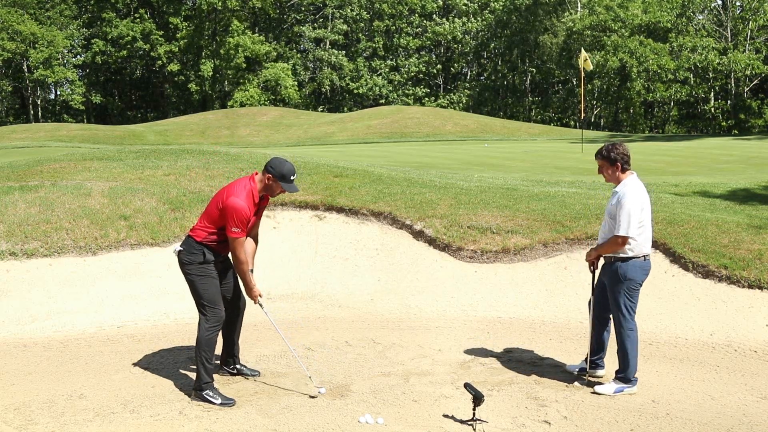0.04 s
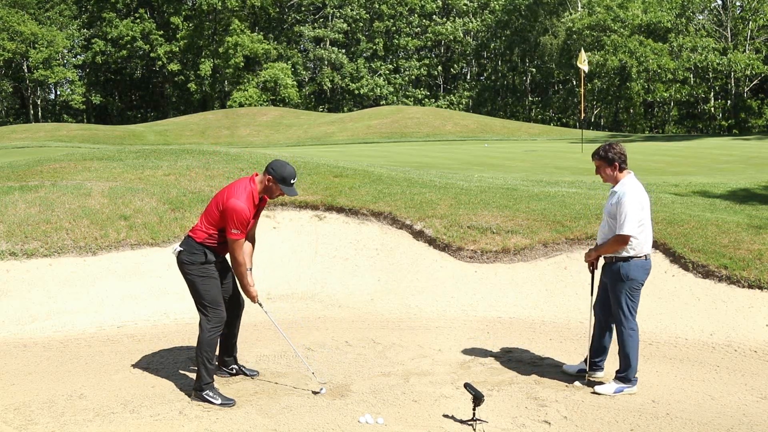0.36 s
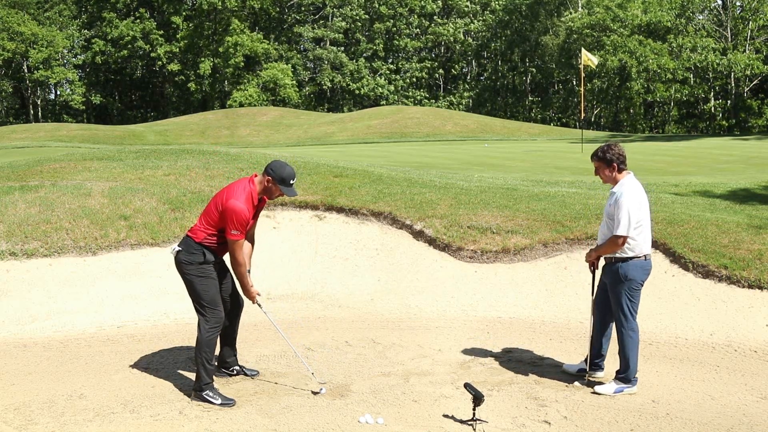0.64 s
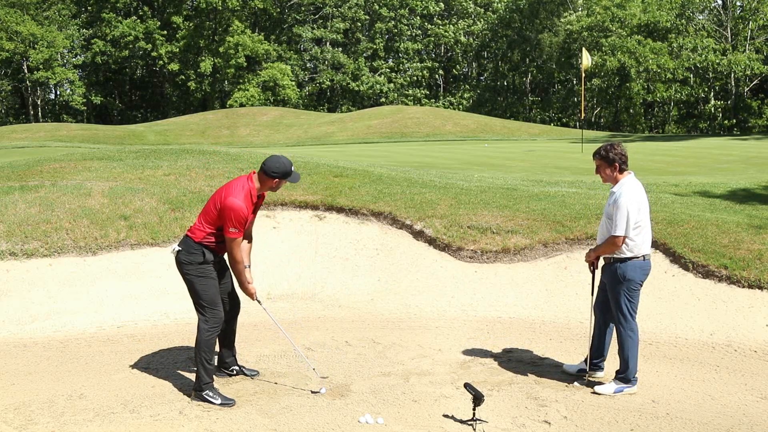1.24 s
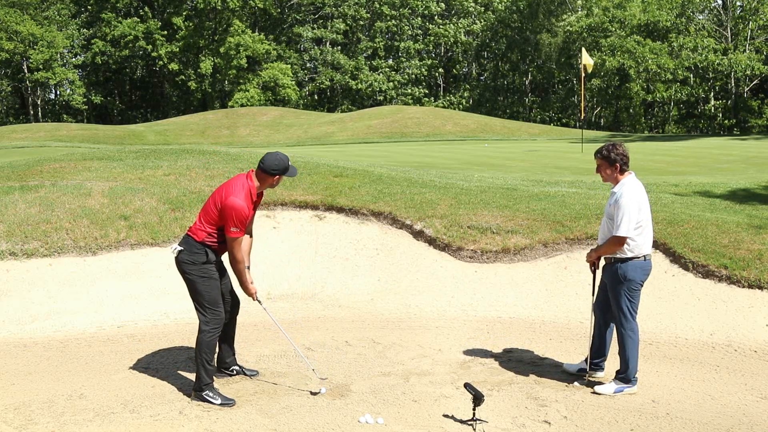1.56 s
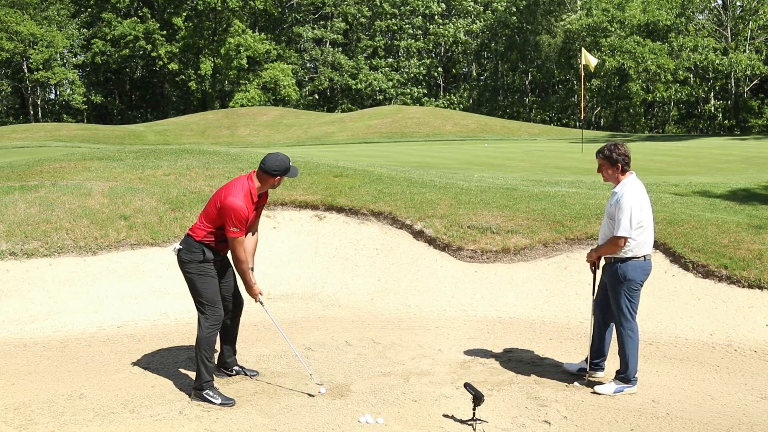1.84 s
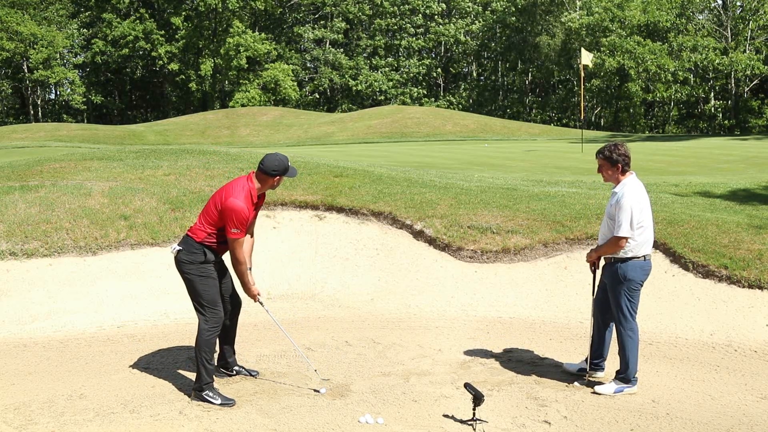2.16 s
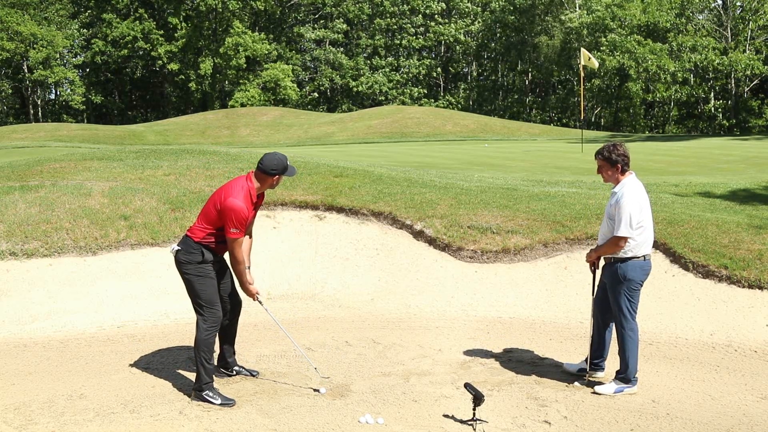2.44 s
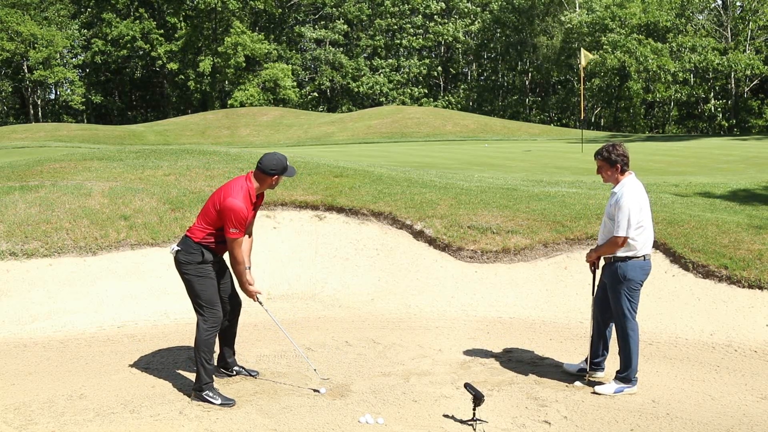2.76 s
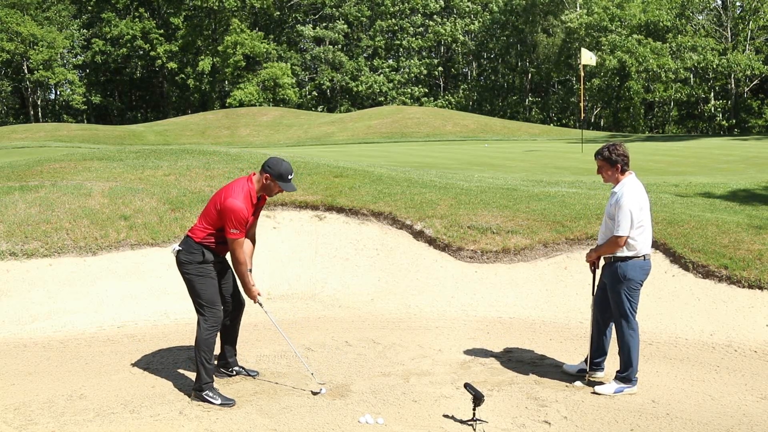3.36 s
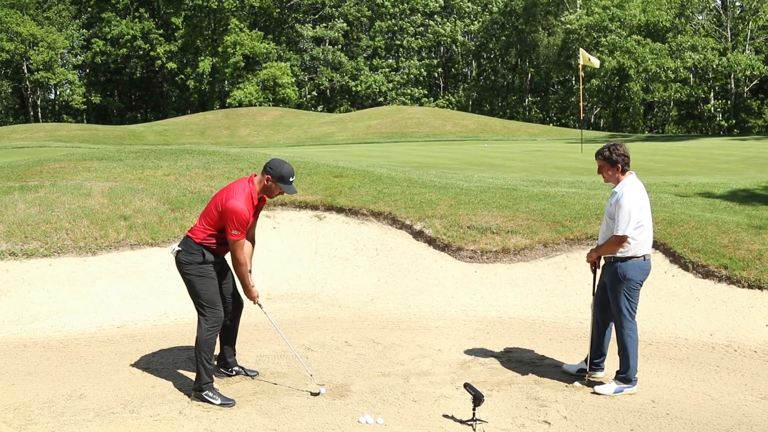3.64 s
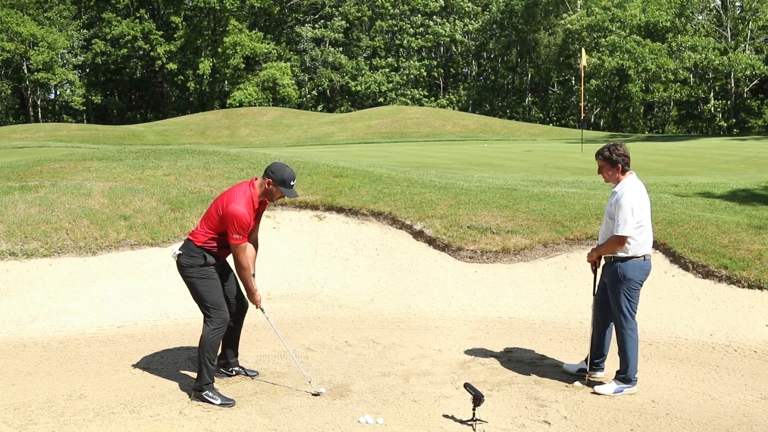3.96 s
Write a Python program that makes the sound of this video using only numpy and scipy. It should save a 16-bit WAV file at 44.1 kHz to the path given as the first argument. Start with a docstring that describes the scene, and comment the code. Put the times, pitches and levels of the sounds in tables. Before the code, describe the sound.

Low gusts buffet the microphone while shoes twist quietly in sand and distant birds chirp.

```python
"""Low wind rumble: a breeze buffets the microphone, harder and brighter in the second half, where
single large eddies thump. A golfer twists his shoes into bunker sand: shearing grains make soft,
gritty scuffs in pairs, then small settling shifts. Small birds call and trill faintly from the
trees behind the green, which scatter the sound, over a quiet hush of air and far foliage."""
import sys
import numpy as np
from scipy import signal
from scipy.fft import rfft, irfft, next_fast_len
from scipy.io import wavfile
from scipy.ndimage import map_coordinates

SR = 44100
rng = np.random.default_rng(int(sys.argv[2]) if len(sys.argv) > 2 else 0)


def waveform_to_disk(signal):
    """Save audio, clipped to [-1, 1], as 16-bit WAV at the path in sys.argv[1]."""
    frames = np.transpose(np.atleast_2d(signal))
    scaled = np.clip(frames, -1, 1) * 32767
    samples = np.round(scaled).astype(np.int16)
    wavfile.write(sys.argv[1], SR, samples)


N = 176400

# wind envelopes: deep rumble, gusts driving flutter and ripple (time [s], level [dB])
RUMBLE_LEVEL = [(0, -25), (.16, -28.5), (.26, -32), (.42, -35.5), (.53, -43.5), (.66, -32.5), (.78, -28.5),
                (.85, -25.5), (.91, -27), (1.0, -27.5), (1.12, -27.5), (1.36, -34), (1.44, -26),
                (1.65, -23.5), (1.78, -27.5), (2.05, -23.5), (2.28, -28), (2.33, -8), (2.41, -18),
                (2.52, -19.5), (2.68, -21.5), (2.78, -18), (3.0, -19.5), (3.19, -26.5), (3.27, -18),
                (3.37, -22), (3.43, -29), (3.5, -24.5), (3.58, -22.5), (3.71, -25), (3.83, -12.5),
                (3.92, -16.5), (4, -24)]
GUST_LEVEL = [(0, -35.5), (.13, -44), (.23, -53), (.32, -46), (.52, -57), (.7, -46), (.83, -32),
              (.93, -40.5), (1.01, -38), (1.23, -46), (1.35, -58), (1.46, -33.5), (1.54, -48), (1.6, -32.5),
              (1.7, -31), (1.88, -50.5), (2.0, -29), (2.09, -44.5), (2.28, -39), (2.43, -23), (2.52, -28),
              (2.77, -26), (2.97, -28), (3.17, -38.5), (3.32, -32), (3.47, -49.5), (3.6, -33.5),
              (3.69, -40.5), (3.83, -24), (3.93, -30), (4, -28)]
# large, medium and smallest eddies (frequency [Hz], relative density [dB])
RUMBLE_SPECTRUM = [(12, -27), (25, -14), (45, -2.5), (70, -0.5), (105, -2.5), (160, -10), (230, -24),
                   (330, -35.5), (500, -48.5), (1000, -78), (2500, -120)]
FLUTTER_SPECTRUM = [(50, -24), (125, -2), (185, 4), (250, -4), (330, -14), (450, -29), (700, -45.5),
                    (2000, -85)]
RIPPLE_SPECTRUM = [(150, -11), (290, 4.5), (400, -0.5), (560, -9.5), (750, -19), (1100, -29.5), (1700, -46),
                   (4000, -75)]
# still air and far foliage (frequency [Hz], relative density [dB])
HUSH_SPECTRUM = [(100, 3.5), (400, 15), (800, 11.5), (1150, 7), (1480, 7.5), (2200, 3.5), (3500, 2.5),
                 (5000, 1), (9000, -0.5), (15500, -1)]
# distant birdsong band (frequency [Hz], relative density [dB])
SONG_SPECTRUM = [(2000, -46), (2900, -4.5), (3400, -0.5), (3850, -0.5), (4200, -3.5), (4800, -15),
                 (6500, -45)]
# distant birdsong envelope (time [s], level [dB])
SONG_LEVEL = [(0, -65), (.62, -61.5), (1.1, -65.5), (1.9, -69), (2.7, -71), (3.55, -68.5), (4, -68.5)]
# shoe twists (full pressure at [s], rise [s], hold [s], release [s], level [dB], treble tilt [dB/octave])
SHOE_SCUFFS = [(0.068, 0.12, 0.098, 0.096, -54.5, -0.5), (0.303, 0.17, 0.014, 0.029, -39, 0.5),
               (0.373, 0.042, .095, 0.059, -42.5, -0.9), (0.713, 0.24, .03, 0.093, -50.5, 0.8),
               (0.839, 0.053, .02, 0.064, -54, -.5), (0.94, 0.067, 0.038, 0.087, -50.5, -2),
               (1.457, 0.13, 0.023, 0.089, -45, -0.4), (1.488, .012, 0.01, .025, -48, .5),
               (1.584, 0.041, 0.049, 0.13, -45, .1), (1.704, 0.029, .01, 0.051, -48, 0.2),
               (1.813, 0.17, 0.1, .12, -56, 1.1), (2.045, 0.088, .06, 0.14, -55, 1),
               (2.284, 0.07, .03, 0.15, -57.5, 1)]
# sand under a sole (frequency [Hz], relative density [dB])
SAND_SPECTRUM = [(100, -19), (300, -2.5), (550, 0.5), (800, 0.5), (1050, 2), (1240, -0.5), (1450, 0),
                 (2300, -5.5), (3500, -4.5), (4300, -9), (7000, -15), (9500, -17.5), (12000, -21.5),
                 (15500, -31)]
# bird notes, and a brief, sharp tick at 2.242 s
# (time [s], length [s], start pitch [Hz], end pitch [Hz], level [dB])
NOTES_AND_TICK = [(0.053, 0.026, 3550, 3530, -55.5), (.085, 0.023, 3550, 3480, -51.5),
                  (0.098, .035, 3320, 3570, -54), (.288, .036, 3950, 3520, -43.5),
                  (0.324, .016, 3590, 3470, -48), (.35, 0.0217, 3484, 3800, -46),
                  (0.494, 0.023, 3080, 3350, -55), (0.531, 0.017, 3130, 3700, -52),
                  (0.562, 0.021, 3900, 3340, -49.5), (0.579, 0.023, 3390, 3520, -54),
                  (.625, .025, 3730, 3900, -57), (0.682, .03, 3570, 3840, -56),
                  (1.053, .042, 5050, 3740, -62), (1.10, 0.047, 4250, 5000, -68),
                  (1.213, .042, 5100, 3690, -63), (1.27, .04, 4300, 5050, -68),
                  (2.242, 0.0071, 4340, 3400, -54.5), (3.953, 0.041, 5400, 5870, -66)]
# far trills (time [s], length [s], pitch [Hz], level [dB])
BIRD_TRILLS = [(.6, 0.36, 3870, -66.5), (1.78, .6, 4530, -73), (2.93, .72, 3940, -70)]
# single large eddies (centre time [s], main frequency [Hz], peak [dB])
EDDY_THUMPS = [(2.396, 55, -12), (2.77, 65, -6), (3.833, 65, -12.5), (3.975, 60.7, -6.5)]

TIME_S = np.arange(N) / SR


def amp(db):
    """Decibels to gain."""
    return 10 ** (np.asarray(db) / 20)


def unit(x):
    """Scale to rms 1."""
    return x / np.sqrt(np.mean(x ** 2) + 1e-20)


def curve(rows):
    """(time [s], value) points to one value per sample."""
    return np.interp(TIME_S, *np.transpose(rows))


def wobble(rate_hz):
    """Smooth random curve, rate_hz knots a second."""
    knots = rng.standard_normal(int(N * rate_hz / SR) + 4)
    return map_coordinates(knots, [TIME_S * rate_hz])


def filtered(x, response):
    """Apply the gain response(hz)."""
    size = next_fast_len(N + SR // 2)
    return irfft(rfft(x, size) * response(np.fft.rfftfreq(size, 1 / SR)), size)[:N]


def coloured(x, spectrum, tilt_db_per_oct=0, pivot_hz=1800):
    """Shape x by a spectrum, tilted above the pivot; rms 1."""
    knot_hz, knot_db = np.transpose(spectrum)

    def response(hz):
        shape_db = np.interp(np.log(hz + 1), np.log(knot_hz), knot_db)
        octaves = np.log2(np.maximum(hz / pivot_hz, 1))
        return amp(shape_db + tilt_db_per_oct * octaves)
    return unit(filtered(x, response))


def noise(spectrum):
    """Coloured noise, rms 1."""
    return coloured(rng.standard_normal(N), spectrum)


def eddies(spectrum, even_s):
    """Turbulent pressure, even in strength over spans longer than even_s."""
    pressure = noise(spectrum)
    window = signal.windows.hann(int(even_s * SR) + 3)
    local_power = signal.fftconvolve(pressure ** 2, window / window.sum(), 'same')
    return unit(pressure / np.sqrt(np.abs(local_power) + 1e-6))


def wind(strong_gust_db=-28.5, ripple_growth=1.18):
    """Eddies hit the microphone; the smallest come in bursts and grow fastest with the gusts."""
    gust_db = curve(GUST_LEVEL)
    lumps = wobble(55)
    burst_db = 2.8 * wobble(110)
    ripple_db = strong_gust_db - 13 + ripple_growth * (gust_db - strong_gust_db)
    rumble = amp(curve(RUMBLE_LEVEL) + 0.5 + 0.79 * lumps) * eddies(RUMBLE_SPECTRUM, even_s=0.088)
    flutter = amp(gust_db + 1.36 * lumps) * eddies(FLUTTER_SPECTRUM, even_s=0.062)
    ripple = amp(ripple_db + 1.9 * lumps + burst_db) * eddies(RIPPLE_SPECTRUM, even_s=0.052)
    return rumble + flutter + ripple


def hush(level_db=-57):
    """Still air and far foliage: steady broadband noise."""
    return amp(level_db) * noise(HUSH_SPECTRUM)


def distant_song():
    """Far birdsong, smeared by the wood into a flickering noise band."""
    return amp(curve(SONG_LEVEL) + 1.24 * wobble(22.2)) * noise(SONG_SPECTRUM)


def shoe_scuffs(grains_per_s=2500, grain_spread_db=2, grain_share=0.39, slip_db=0.4):
    """Each twist shears sand grains; pressure builds, holds with small slips, lets go."""
    out = np.zeros(N)
    for full_s, rise_s, hold_s, release_s, level_db, tilt_db_per_oct in SHOE_SCUFFS:
        before = np.maximum(full_s - TIME_S, 0) / rise_s
        after = np.maximum(TIME_S - full_s - hold_s, 0) / release_s
        pressure_db = -20 * (before ** 2 + after ** 2)
        hits = rng.random(N) < grains_per_s / SR
        grains = hits * rng.standard_normal(N) * amp(grain_spread_db * rng.standard_normal(N))
        grit = np.sqrt(grain_share) * unit(grains) + np.sqrt(1 - grain_share) * rng.standard_normal(N)
        envelope = amp(level_db + pressure_db + slip_db * wobble(90))
        out += envelope * coloured(grit, SAND_SPECTRUM, tilt_db_per_oct)
    return out


def bird_notes_and_tick(waver=0.024):
    """Short sine glides: bird notes, except the 7 ms one, heard as a brief, sharp tick."""
    out = np.zeros(N + SR)
    for start_s, length_s, start_hz, end_hz, level_db in NOTES_AND_TICK:
        n = int(length_s * SR)
        progress = np.linspace(0, 1, n)
        glide_hz = start_hz + (end_hz - start_hz) * progress
        phase = 2 * np.pi * np.cumsum(glide_hz * (1 + waver * wobble(230)[:n])) / SR
        envelope = amp(level_db) * np.sqrt(2) * np.sin(np.pi * progress)
        out[int(start_s * SR):][:n] += envelope * np.sin(phase)
    return out[:N]


def tree_echo(calls, t60_s=0.71, level_db=-2.5):
    """Trees scatter the calls into a decaying tail."""
    tail = rng.standard_normal(SR) * amp(-60 * TIME_S[:SR] / t60_s)
    return amp(level_db) * signal.fftconvolve(calls, tail / np.linalg.norm(tail))[:N]


def bird_trills(notes_per_s=10, waver=0.028):
    """Far birds each repeat one thin, wavering note."""
    out = np.zeros(N)
    for start_s, length_s, pitch_hz, level_db in BIRD_TRILLS:
        age_s = TIME_S - start_s
        swell = np.sqrt(np.abs(np.sin(np.pi * np.clip(age_s / length_s, 0, 1))))
        pulses = 1 - np.cos(2 * np.pi * notes_per_s * age_s) / 2
        phase = 2 * np.pi * np.cumsum(pitch_hz * (1 + waver * wobble(400))) / SR
        out += amp(level_db + 2.5 * wobble(150)) * swell * pulses * np.sin(phase)
    return out


def eddy_thumps():
    """A large eddy sucks, then pushes, once as it passes the microphone."""
    out = np.zeros(N)
    for centre_s, main_hz, peak_db in EDDY_THUMPS:
        passage = 2 * np.pi * main_hz * (TIME_S - centre_s)
        out += amp(peak_db) * passage * np.exp((1 - passage ** 2) / 2)
    return out


def scene():
    """Wind, shoes and birds over the hush; mono."""
    buffeting = wind() + eddy_thumps()
    scuffs = shoe_scuffs()
    calls = bird_trills() + bird_notes_and_tick()
    birds = calls + tree_echo(calls) + distant_song()
    return (buffeting + scuffs + birds + hush())[None]


def record(dry, band_limit_hz=15800, fade_s=0.003):
    """Brief end fade, then the recorder's band limit."""
    fade = np.minimum(TIME_S[::-1] / fade_s, 1)
    return np.array([filtered(x * fade, lambda hz: hz < band_limit_hz) for x in dry])


dry = scene()
out = record(dry)
waveform_to_disk(out)
```